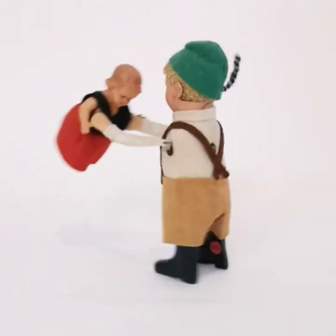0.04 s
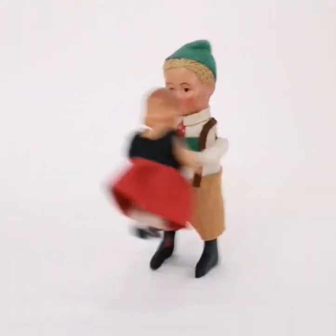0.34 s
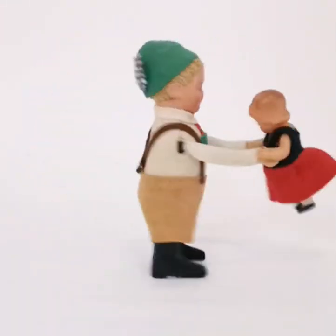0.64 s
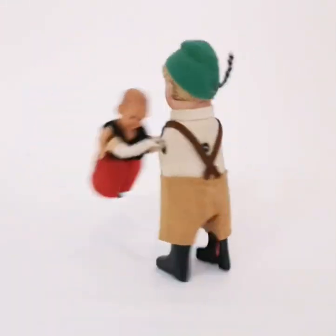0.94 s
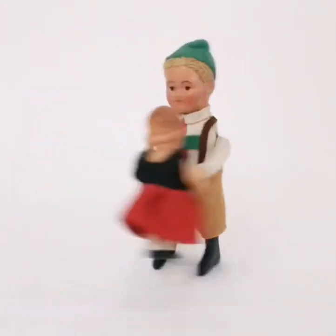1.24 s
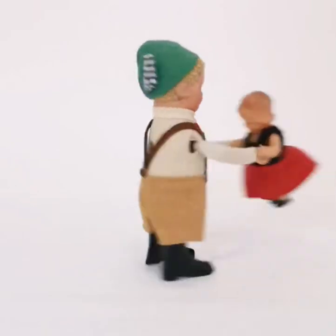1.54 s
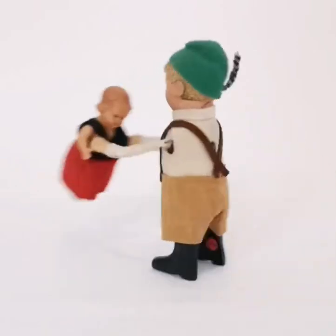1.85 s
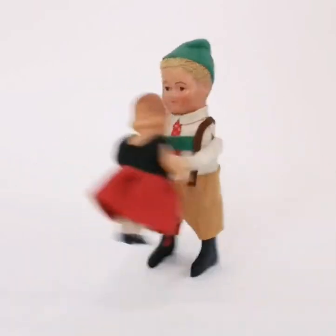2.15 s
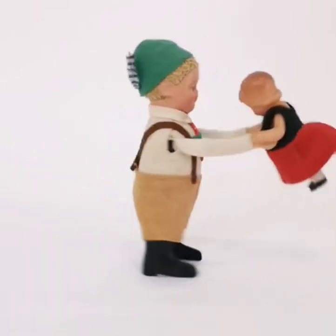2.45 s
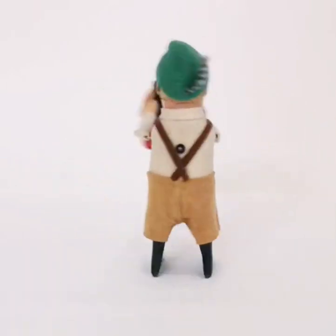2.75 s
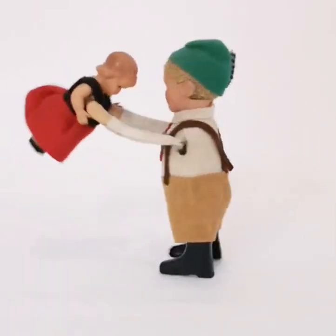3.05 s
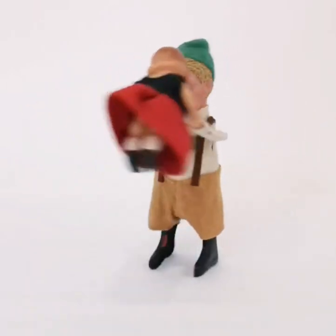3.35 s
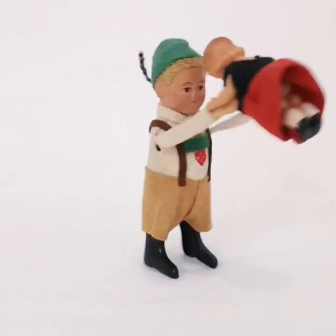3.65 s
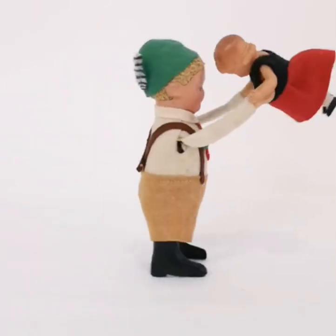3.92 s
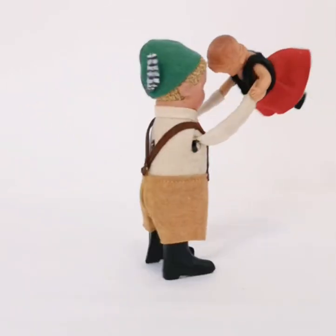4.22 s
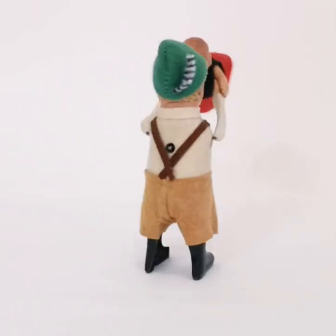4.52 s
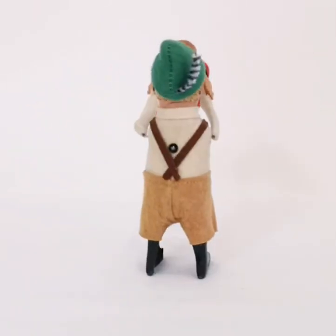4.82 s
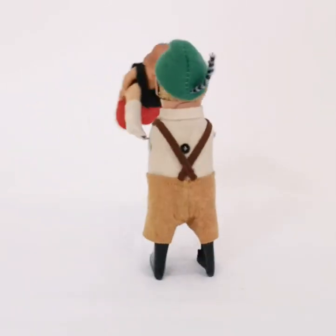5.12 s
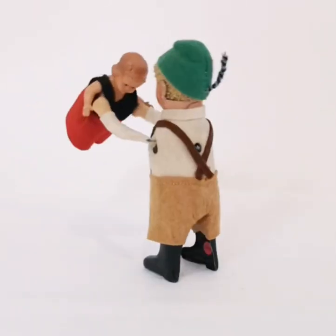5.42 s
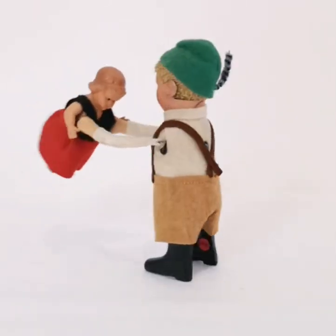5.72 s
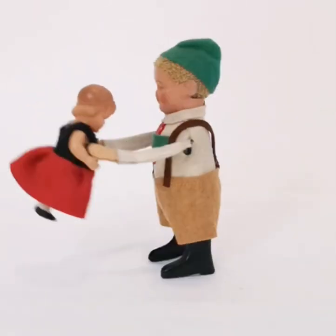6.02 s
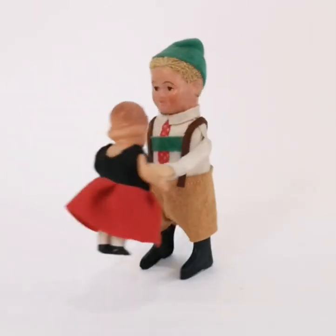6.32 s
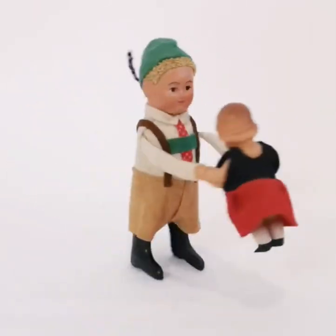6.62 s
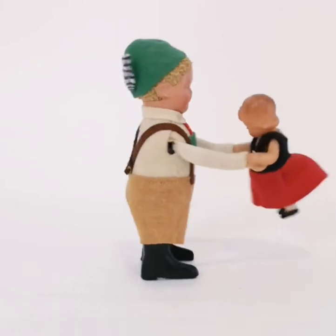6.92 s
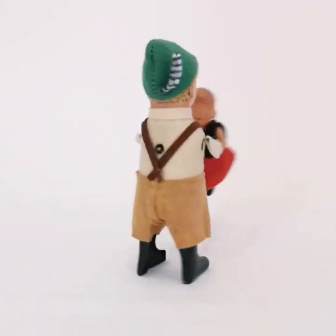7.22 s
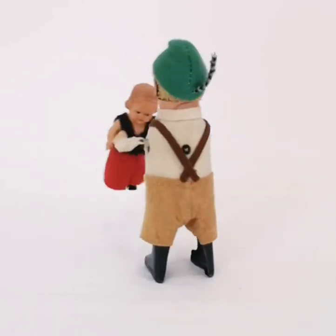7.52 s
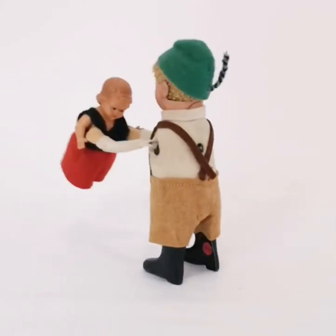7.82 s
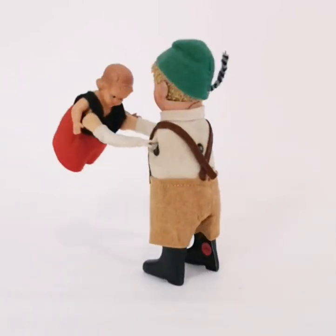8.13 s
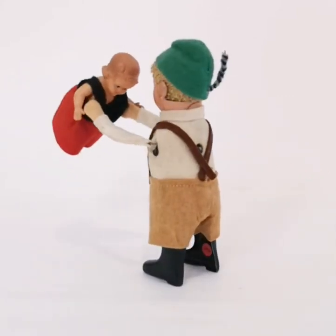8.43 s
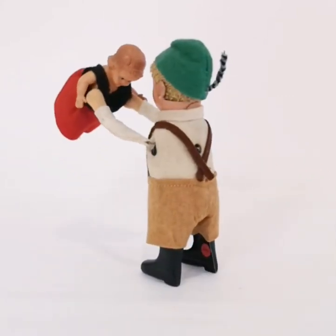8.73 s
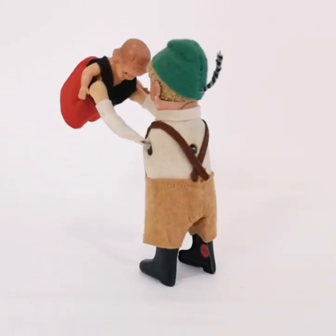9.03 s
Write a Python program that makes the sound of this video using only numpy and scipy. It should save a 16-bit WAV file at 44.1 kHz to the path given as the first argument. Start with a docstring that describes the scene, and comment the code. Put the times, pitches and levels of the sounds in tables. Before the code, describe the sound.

A wind-up toy's spring motor whirrs close by for about nine seconds, its very fast ticking blending into a bright buzz and tinny rattle that shift in tone as the toy turns. From the start its boots judder on a tabletop, making a low thrum that surges unevenly, with dull knocks and light taps through the first 2.5 seconds. Around 1.5 seconds come a dry click, a sharp gear snap and a brief gritty skid. The table hums more strongly near 3.7 seconds, then the juddering eases from about 4 seconds, while several small gear snaps sound up to 5.5 seconds. The shaking picks up near 6 seconds, with a few more knocks and taps until 7.5. By 8 seconds it has almost stopped, and the motor whirrs on slightly softer. A low rumble of the small room lies underneath throughout.

```python
"""A clockwork dancer spins on a tabletop indoors, swinging his partner up and down.
From the start the spring motor ticks some 170 times a second, ringing a tin body whose tone shifts as
he turns. His boots judder and knock on the table, and he lurches as a cam loads and frees the motor.
Gears snap, boots tap, and at 1.5 s a sole skids. He slows around 4 s, picks up near 6 s and all but
stops at 8 s, while the motor ticks on over a low room rumble."""
import sys
import numpy as np
from scipy import signal
from scipy.fft import rfft, irfft, next_fast_len
from scipy.io import wavfile
from scipy.ndimage import uniform_filter1d

SR = 44100
rng = np.random.default_rng(int(sys.argv[2]) if len(sys.argv) > 2 else 0)


def dump(signal):
    """Clip the signal to [-1, 1] and save it as 16-bit WAV at the path in sys.argv[1]."""
    limited = np.clip(np.atleast_2d(signal).T, -1, 1)
    pcm = np.round(limited * 32767).astype(np.int16)
    wavfile.write(sys.argv[1], SR, pcm)


N = 408366
TIME, FREQ = np.arange(N) / SR, np.maximum(np.fft.rfftfreq(N, 1 / SR), 1)


def undb(db):
    """Turn decibels into a gain to multiply by."""
    return np.exp(np.asarray(db) * (np.log(10) / 20))

def unit(x):
    """Scale a sound so that the average of its channels has strength (rms) 1."""
    return x / np.std(np.atleast_2d(x).mean(axis=0))

def over_time(rows):
    """Join (time, value) points with straight lines."""
    return np.interp(TIME, *np.transpose(rows))

def over_pitch(rows):
    """One curve across frequency for each column after the first."""
    hz, *columns = np.transpose(rows)
    return [np.interp(np.log(FREQ), np.log(hz), c) for c in columns]

def shape(x, response):
    """Filter a sound with one gain for each frequency in FREQ."""
    size = next_fast_len(N + SR // 2, True)
    gains = np.interp(np.fft.rfftfreq(size, 1 / SR), FREQ, response)
    return irfft(rfft(x, size) * gains, size)[..., :N]

def colour(x, rows):
    """Filter a sound with a table of (frequency, level) points."""
    return shape(x, undb(over_pitch(rows)[0]))

def walk(rate):
    """A random drift, about 1 in size, that changes course some `rate` times a second."""
    corners = np.cumsum(rng.uniform(.5, 1.5, 2000)) / rate
    return 1.2 * np.interp(TIME, corners, rng.standard_normal(len(corners)))

def noise_pair(alike):
    """Left and right noise, from unrelated (alike=0) to the same (alike=1)."""
    return np.sqrt(alike) * rng.standard_normal(N) + np.sqrt(1 - alike) * rng.standard_normal((2, N))

def swells(rows):
    """Smooth rises and falls in loudness, one for each (middle, half length, level) row."""
    return sum(undb(db) * np.exp(-((TIME - s) / half) ** 2) for s, half, db in rows)

def blows(times, sizes, rise_s, decay_s):
    """The loudness of blows that rise and die away; each peaks near its size."""
    train = np.zeros(N)
    np.add.at(train, np.clip((times * SR).astype(int), 0, N - 1), sizes)
    t = TIME[:SR // 10]
    swell = (1 - np.exp(-t / rise_s)) ** 2 * np.exp(-t / decay_s)
    return signal.oaconvolve(train, swell / swell.max())[:N]

def cracks(rows, tone, decay_s, gain_db):
    """Short bursts of filtered noise, one for each (time, level) row."""
    times, db = np.transpose(rows)
    return unit(colour(noise_pair(.5), tone)) * blows(times, undb(db + gain_db), .00012, decay_s)


# how far the dancer has turned: (time [s], angle [turns])
SPIN = [(0.0, 0.59), (0.25, 0.76), (0.75, 1.29), (1.25, 1.94), (1.75, 2.54), (2.25, 2.99), (2.75, 3.47),
        (3.15, 3.83), (3.55, 4.03), (3.85, 4.21), (4.25, 4.37), (5.0, 4.49), (5.75, 4.67), (6.25, 4.91),
        (7.25, 5.42), (7.5, 5.55), (8.0, 5.67), (9.26, 5.69)]
def spin():
    """The dancer's turns so far; at whole numbers he faces the listener."""
    return over_time(SPIN)

# his lurches: (middle [s], half length [s], relative level [dB])
LURCHES = [(.15, 0.06, -.5), (.86, .1, -31), (1.53, 0.019, -18), (2.18, 0.16, -6), (2.98, 0.031, -9),
           (3.7, 0.12, 1), (4.44, 0.11, -6), (5.14, .12, -6.5), (5.78, 0.11, -7), (6.46, 0.11, -.5),
           (7.04, 0.2, -6), (7.76, 0.12, -15.5)]
def lurches():
    """About once a cam stroke he lurches and presses harder on the table."""
    return swells(LURCHES)

def judder_strength():
    """How hard the boots judder: about 1 at one turn a second, more with faster spin or a lurch."""
    speed_power, standing_db = 1.89, -32
    speed = uniform_filter1d(np.gradient(spin()) * SR, size=SR // 4)
    return np.hypot(np.abs(speed) ** speed_power, undb(standing_db)) + lurches()

# the motor's average pace: (time [s], pace [ticks per second])
PACE = [(0, 172), (.9, 175), (1.5, 170), (2.5, 167), (3.2, 169), (3.7, 175), (4.3, 175), (5.4, 181),
        (6.7, 173), (8.2, 181), (8.8, 172)]
def governor():
    """Count the ticks of the governor, the motor's brake; a turning cam slows and frees it evenly."""
    stroke_s, first_free_s, speedup = .687, .13, .027
    stroke = np.cos(2 * np.pi * (TIME - first_free_s) / stroke_s)  # 1 running free, -1 fully loaded
    flutter = .012 * walk(30)
    return np.cumsum(over_time(PACE) * (1 + speedup * stroke + flutter)) / SR

def chattering(ticks, sizes, rise_s, decay_s, buzz):
    """Each tick sets loose tin chattering, over a gear buzz that grows as he judders."""
    chatter = buzz * (1 + .3 * judder_strength()) + blows(ticks, sizes, rise_s, decay_s)
    # the spring's steady push evens out the strength
    return chatter / np.sqrt(uniform_filter1d(chatter ** 2, size=SR // 4))

# tones that sing out: (middle [s], half length [s], pitch [Hz], boost [dB])
SINGS = [(.19, .12, 2540, 6.5), (.72, .06, 6400, 4.5), (.72, .08, 4880, 4), (.77, .08, 2020, 5),
         (1, .05, 7270, 4), (1.1, .09, 2540, 4), (1.1, .12, 2940, 3), (1.3, .08, 6400, 4),
         (1.33, .1, 1600, 3), (2.87, .09, 7200, 4), (3.05, .16, 2940, 5), (3.6, .12, 1610, 3.5),
         (3.72, .2, 4900, 4), (3.92, .1, 6480, 4.5), (5, .2, 2950, 4), (6.35, .2, 8700, 5),
         (6.6, .15, 4880, 4), (6.9, .08, 6700, 3.5), (7.18, .13, 8700, 10.5), (7.5, .15, 8700, 4),
         (8.6, .6, 1770, 1.5), (9.05, .25, 9000, 4)]
def singing(hz):
    """A loose part buzzes against the tin and lifts the tone at `hz`, if close in pitch; gives dB."""
    reach = .035  # share of the pitch
    return sum(db * np.exp(-((pitch / hz - 1) / reach) ** 2 - ((TIME - s) / half) ** 2)
               for s, half, pitch, db in SINGS if abs(pitch / hz - 1) < 2 * reach)

def ring(chatter, tones, alike, wander_db, beam_focus):
    """Chatter rings the tin's tones; each sends out beams that sweep past the listener once a turn."""
    angle, grit, out = spin(), noise_pair(alike), 0
    for hz, width, left_db, right_db, *beams in tones:
        b, a = signal.iirpeak(hz, hz / width, fs=SR)
        drive = chatter * np.roll(grit, rng.integers(N), axis=1)
        rung = signal.lfilter(np.convolve(b, b), np.convolve(a, a), drive)  # the filter, twice over
        beam_db = sum(db * np.exp(beam_focus * (np.cos(2 * np.pi * (angle - facing)) - 1))
                      for facing, db in zip(beams[::2], beams[1::2]))
        gain = undb(beam_db + singing(hz) + wander_db * walk(7))
        out = out + rung * gain * undb([[left_db], [right_db]])
    left, right = out
    return unit(np.array([left, np.roll(right, 4)]))  # the sound reaches the right side later

# the tin body's tones: (pitch [Hz], width [Hz], left level [dB], right level [dB]),
# then for each beam (angle [turns], boost [dB]); a negative boost is a shadow
SHELL_TONES = [(1094, 456, -7.5, -6, .66, 2, .32, -1), (1372, 290, -9, -4.5, .73, -4.5, .53, -2.5),
               (1590, 200, -9, -2, .06, 6, .62, -6), (1765, 230, -9.5, .5, .24, 2, .65, 2.5, .44, -4.5),
               (1994, 320, -8.5, -2.5, .34, 2.5, .19, 2), (2250, 330, -6, -7, .77, 5, .59, 4, .87, 2.5),
               (2544, 350, -4, -6, .77, 3, .24, 2.5), (2944, 420, -9.5, -6.5, .51, 3.5, .19, -6),
               (3510, 1070, -9.5, -8.5, .06, -4, .53, -1)]
# how loudly the body rattles: (time [s], relative level [dB])
RATTLE_LEVEL = [(0.0, -1), (0.25, 2.3), (0.5, -0.4), (0.8, 4.5), (1.05, 0.5), (1.4, 3), (1.8, 1),
                (2.7, 0.5), (3.4, -0.2), (3.9, 0.4), (4.35, 1.9), (4.75, -4.5), (5.1, 1), (5.45, -2.2),
                (5.75, 0.4), (6.8, 2.5), (8.1, -1.8), (9.26, -2.5)]
# the loose shell clacks: (time [s], level against the usual rattle [dB])
CLACKS = [(.145, 4), (.191, 4), (.626, 3), (1.095, 7), (1.148, 3), (1.819, 4), (2.239, 3), (2.271, 3),
          (3.237, 3), (3.416, 2.5), (3.883, 4), (4.023, 4.5), (4.336, 6), (6.401, 3), (7.078, 3),
          (7.432, 4), (7.826, 3.5), (8.05, 3.5)]
def shell_rattle(ticks, sizes):
    """The ticks ring the tin body, and now and then its loose shell clacks."""
    times, db = np.transpose(CLACKS)
    clacks = blows(times - .001, undb(db), rise_s=.001, decay_s=.002)
    chatter = chattering(ticks, sizes, rise_s=.0003, decay_s=.0011, buzz=.24)
    shell = ring(chatter + clacks, SHELL_TONES, alike=.7, wander_db=.7, beam_focus=3.5)
    return shell * undb(over_time(RATTLE_LEVEL) - 55)

# tones of the gear plates and of the gear teeth: (pitch [Hz], width [Hz], left level [dB],
# right level [dB]), then for each beam (angle [turns], boost [dB])
PLATE_TONES = [(4266, 720, -13, -7.5, .65, -9, .86, -7, .04, 1.5), (4880, 430, -7, -3.5, .64, -9, .18, 3.5),
               (5330, 560, -5, -1.5, .04, 4, .7, -1.5, .26, 1.5),
               (5910, 900, -3.5, -1, .28, 3, .53, 2.5, .73, 1), (6430, 500, -7, -1.5, .25, 6),
               (6760, 460, -4, -1, .6, 4, .46, -2), (7270, 720, -8.5, .5, .608, 5, .16, -3, .35, -2),
               (7760, 850, -5, -6, .12, -5, .63, -2)]
TOOTH_TONES = [(8520, 620, -9, -3.5, .33, -1, .51, 3), (8850, 410, -7, 1, .35, -4, .12, -5, .99, 1),
               (9320, 750, -12.5, 0, .49, 2.5, .83, -3), (10100, 550, -23.5, -9, .43, 5, .89, 3, .23, 6),
               (10730, 2200, -27, -9.5, .04, -6.5, .49, -5.5, .24, -1.5),
               (12876, 4070, -21.5, -23.5, .71, -1, .04, -2.5)]
# how loudly they whirr: (time [s], relative level [dB])
WHIRR_LEVEL = [(0.0, 1.9), (0.45, -0.5), (0.9, 2.5), (1.2, 0.9), (1.85, 1.2), (2.3, -1.1), (2.85, 0.6),
               (3.55, -1.4), (4.3, 1.9), (4.75, -1.5), (5.05, 2), (5.6, 0.4), (6.1, 0.5), (7.1, 1.6),
               (7.7, 2.0), (8.15, -1.7), (8.5, -0.5), (8.9, -2.5), (9.26, -0.5)]
def gear_whirr(ticks, sizes):
    """The ticks ring the gear plates and teeth in a bright whirr."""
    plate_chatter = chattering(ticks, sizes, rise_s=.00025, decay_s=.00055, buzz=.24)
    plates = ring(plate_chatter, PLATE_TONES, alike=.5, wander_db=.9, beam_focus=9)
    tooth_chatter = chattering(ticks, sizes, rise_s=.00027, decay_s=.00055, buzz=.26)
    teeth = ring(tooth_chatter, TOOTH_TONES, alike=.15, wander_db=.8, beam_focus=5)
    return (plates * undb(-57.5) + teeth * undb(-60)) * undb(over_time(WHIRR_LEVEL))

# the eight teeth of the wheel that drives the governor: (relative force [dB])
WHEEL_TEETH = [-4, -3.5, -1.7, -4.5, -1, -12, -19.5, -1]
def motor(tick_count):
    """Each uneven tooth of the wheel makes one tick, a little random in timing and force."""
    starts = np.flatnonzero(np.diff(np.floor(tick_count)))
    late, force, rattle = np.clip(rng.standard_normal((len(starts), 3)), -1.8, 1.8).T
    ticks = starts / SR + .0003 * late
    tooth_db = np.resize(WHEEL_TEETH, len(starts))
    shell_sizes = undb(.4 * force + 1.1 * rattle + .7 * tooth_db)
    gear_sizes = undb(2.2 * force + .5 * tooth_db)
    return shell_rattle(ticks, shell_sizes) + gear_whirr(ticks, gear_sizes)

def judder(spread_db, per_second=750):
    """Tiny knocks of the boots at random moments."""
    jolts = (rng.random(N) < per_second / SR) * rng.choice([-1, 1], N)
    return jolts * undb(spread_db * rng.standard_normal(N))

# the tabletop's own tones: (pitch [Hz], width [Hz], level [dB])
TABLE_TONES = [(64.6, 17.7, 1.5), (82.1, 10.4, 5.5), (99.1, 9.5, 5.5), (142.6, 14.9, 1.5),
               (174.5, 7.2, 1.5), (198.2, 10.5, 1), (274.1, 27.8, -0.5), (293.7, 9.5, 1.5),
               (305.3, 30, -4.5), (354.3, 46, -5), (432, 53, -13.5), (436, 16, -24), (497, 8.4, -23),
               (620, 59, -34), (613, 5.8, -15.5), (724, 11, -25), (850, 14, -29)]
# how they reach the two sides: (pitch [Hz], left lead [rad], left minus right [dB], unshared part [0-1])
TABLE_SIDES = [(56.3, -0.85, -2, 0.04), (153, 0.13, 1.5, 0), (226, -1.62, 0, 0.02), (313, -1.5, 1, 0.07),
               (336.5, -2.5, -0.5, 0.09), (504, -2.5, -5, 0.24), (645, -2.5, -3, 0.49), (920, -3, -14, 0)]
# pitch bands the boots shake: (from [Hz], to [Hz], level at judder 1 [dB], growth [dB per dB of judder])
JUDDER_BANDS = [(57.3, 161.6, -33, 0.43), (152.2, 234.6, -37.5, 0.66), (220, 445, -42, 0.99),
                (430, 906, -64.5, 0.8)]
# a sole scuffs: (middle [s], half length [s], level [dB])
SCUFFS = [(.16, 0.047, -52), (.36, 0.037, -52.5), (.85, 0.064, -45), (1.03, 0.11, -54),
          (1.42, 0.066, -53.5), (1.53, 0.028, -42.5), (1.67, 0.17, -53.5), (2.02, 0.028, -56),
          (2.97, 0.024, -54.5)]
# a scuff's strength in each of those bands: (boost [dB])
SCUFF_BOOSTS = [-10, -19, 7, -0.5]
def tabletop(wheel_turns):
    """Juddering, scuffing boots shake the table; harder contact brings out its higher tones."""
    tones = sum((-1) ** k * undb(db) / (1 + 1j * (FREQ / hz - hz / FREQ) * hz / width)
                for k, (hz, width, db) in enumerate(TABLE_TONES))
    lead, pan_db, apart = over_pitch(TABLE_SIDES)
    apart = np.clip(apart, 0, 1)
    sides = tones * undb(pan_db / 2) * np.exp(1j * lead), tones * undb(-pan_db / 2)
    # each turn of the wheel rocks him on his soles, every second one harder
    rocking = undb(3.8 * np.sin(2 * np.pi * wheel_turns) + 1.7 * np.sin(np.pi * wheel_turns))
    drive, scuff, out = judder_strength(), swells(SCUFFS), 0
    for (low, high, db, growth), scuff_db in zip(JUDDER_BANDS, SCUFF_BOOSTS):
        band = 1 / np.sqrt((1 + (low / FREQ) ** 20) * (1 + (FREQ / high) ** 20))
        shared = judder(spread_db=.54) * rocking
        thrum = np.array([shape(shared, band * side * np.sqrt(1 - apart))
                          + shape(judder(spread_db=1), band * side * np.sqrt(apart)) for side in sides])
        # the spring's steady push evens out the strength
        strength = np.sqrt(uniform_filter1d(np.mean(thrum ** 2, axis=0), size=SR // 7))
        gain = np.hypot(undb(db) * drive ** growth, undb(scuff_db) * scuff)
        out = out + unit(thrum / strength) * gain
    return out

# the wheel's shake: (rate [shakes per wheel turn], relative level [dB])
WHEEL_SHAKE = [(5, -13), (6, -17), (8, -2), (13, -18)]
def wheel_hum(wheel_turns):
    """The wheel's shake runs down the legs and hums in the table, most when a lurch presses on it."""
    tones = sum(undb(db + 2 * walk(10)) * np.sin(2 * np.pi * shakes * wheel_turns)
                for shakes, db in WHEEL_SHAKE)
    return tones * (judder_strength() * undb(-35) + lurches() ** 1.57 * undb(-30.3))

def room_echo(sound):
    """A small room's reflections; the swinging figures keep changing the paths."""
    fade_s = .048  # time to fall by 60 dB
    t, out = TIME[:SR // 3], 0
    for _ in range(4):
        tail = rng.standard_normal((2, len(t))) * undb(-60 * t / fade_s) * (t > .003)
        tail /= np.sqrt(np.sum(tail[0] ** 2))
        out = out + signal.oaconvolve(sound * walk(9), tail, axes=1)[:, :N] / 2
    return out * undb(-8)

# the rumble's tone: (frequency [Hz], relative level [dB])
RUMBLE_TONE = [(10, -2.5), (25, -1), (40, 2.5), (52, -2.5), (64, 6.5), (80, -26), (100, -16.5), (150, -35),
               (250, -24.5), (400, -36.5), (800, -41.5), (4000, -43), (15000, -60.5)]
# its loudness: (time [s], level [dB])
RUMBLE_LEVEL = [(0, -33), (.5, -37.5), (1.2, -37), (1.7, -37), (5, -39), (7.6, -39), (8.2, -41),
                (9.26, -40.5)]
def room_rumble():
    """A low, wavering rumble with a faint hiss, nearly the same left and right."""
    rumble = unit(colour(noise_pair(.98), RUMBLE_TONE))
    return rumble * undb(over_time(RUMBLE_LEVEL) + 1.2 * walk(8.9))

# heel knocks: (time [s], peak level [dB])
KNOCKS = [(.079, -24), (.127, -23), (.612, -25), (.702, -24), (.731, -24), (.84, -19), (1.104, -22),
          (1.353, -22), (1.514, -21), (1.643, -23), (1.763, -23), (2.052, -25), (2.126, -24), (2.494, -21),
          (3.742, -25), (5.72, -25), (6.452, -23), (6.793, -24), (7.163, -24)]
# their tone: (frequency [Hz], relative level [dB])
KNOCK_TONE = [(25, -25), (70, 0), (180, 0), (300, -7), (450, -26), (900, -50), (3000, -90)]
def heel_knocks():
    """A heel drops on the table with a short dull thud."""
    times, db = np.transpose(KNOCKS)
    drops = np.zeros(N)
    drops[(times * SR).astype(int)] = undb(db)
    peak = colour(signal.unit_impulse(N, N // 2), KNOCK_TONE).max()
    return -colour(drops, KNOCK_TONE) / peak

# gear snaps: (time [s], relative level [dB])
SNAPS = [(.427, -37.5), (1.3135, -35.5), (1.4085, -34), (1.498, -26.5), (1.915, -37), (4.3685, -36),
         (4.606, -38), (4.836, -38), (5.1904, -38), (5.2848, -33.5), (5.3295, -37), (5.5085, -30.5),
         (5.991, -38), (7.111, -37), (7.41, -38), (8.928, -40)]
# their tone: (frequency [Hz], relative level [dB])
SNAP_TONE = [(500, -17), (2000, -31), (4200, 7), (7000, 19), (9500, 14), (12000, -26), (15500, -25)]
def gear_snaps():
    """The gears give sharp, bright snaps."""
    return cracks(SNAPS, SNAP_TONE, decay_s=.0008, gain_db=-5)

# boot taps: (time [s], relative level [dB])
TAPS = [(0.816, -46), (0.86, -52), (1.003, -50), (1.231, -47), (1.33, -50), (1.423, -47), (2.952, -57),
        (6.586, -49.5), (7.254, -55), (7.341, -49.5), (7.52, -54)]
# their tone: (frequency [Hz], relative level [dB])
TAP_TONE = [(150, -10), (600, 2), (1700, 4), (4000, -14), (12000, -37)]
def boot_taps():
    """A boot taps lightly down on the table."""
    return cracks(TAPS, TAP_TONE, decay_s=.0049, gain_db=3.5)

# the click's tone: (frequency [Hz], relative level [dB])
CLICK_TONE = [(300, 14), (2000, 10), (5000, 2), (15000, -6)]
def click(time_s=1.4233):
    """A single dry click."""
    return colour(signal.unit_impulse(N, int(time_s * SR)), CLICK_TONE) * undb(-21.5)

# boot skids: (middle [s], half length [s], level [dB])
SKIDS = [(1.53, 0.042, -44.5), (1.627, 0.018, -43.5)]
# their tone: (frequency [Hz], relative level [dB])
SKID_TONE = [(300, -20), (700, -3), (2000, 2), (3600, -5), (4800, 1), (6500, 0), (9500, 6), (11500, -12),
             (13500, -17), (15000, -10)]
def boot_skids():
    """A sole slides with a brief gritty hiss, louder on the right."""
    grit = noise_pair(.17) * undb(2 * walk(180))
    return unit(colour(grit, SKID_TONE) * undb([[-7], [0]])) * swells(SKIDS)

def scene():
    """The toy, the table under it and the room."""
    tick_count = governor()
    wheel_turns = tick_count / len(WHEEL_TEETH)
    toy = gear_snaps() + motor(tick_count) + boot_skids() + click() + boot_taps()
    echo = room_echo(toy)
    table = tabletop(wheel_turns) + heel_knocks() + wheel_hum(wheel_turns)
    return toy + echo + table + room_rumble()

def record(dry):
    """Cut the treble above 15500 Hz."""
    return signal.sosfilt(signal.ellip(10, .2, 80, 15500, fs=SR, output="sos"), dry)


dry = scene()
out = record(dry)
dump(out)
```